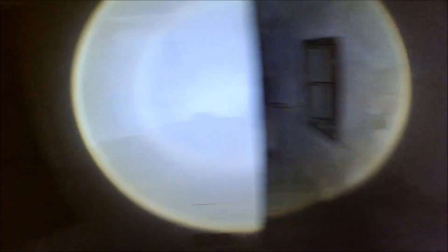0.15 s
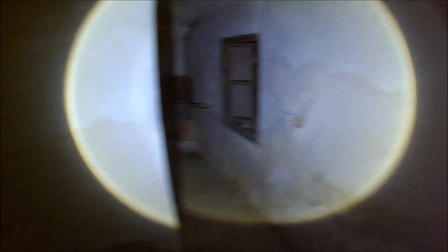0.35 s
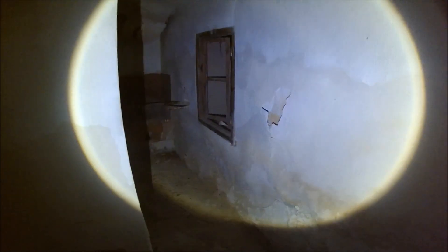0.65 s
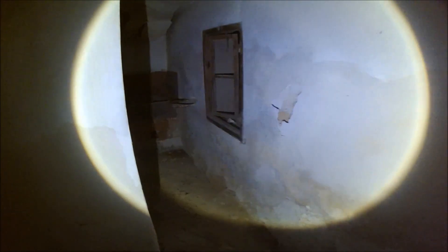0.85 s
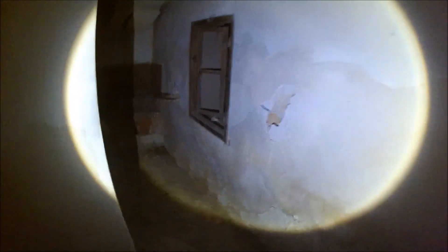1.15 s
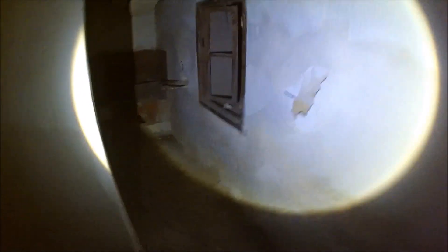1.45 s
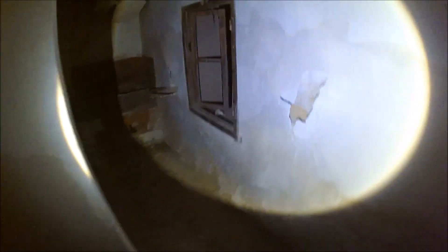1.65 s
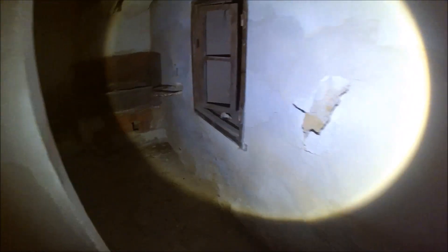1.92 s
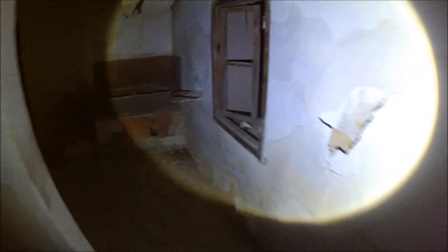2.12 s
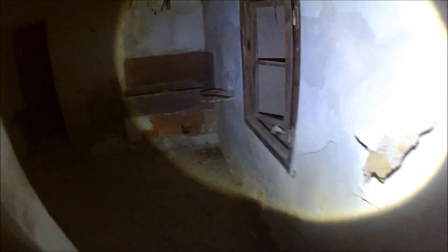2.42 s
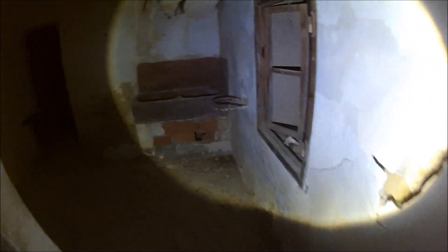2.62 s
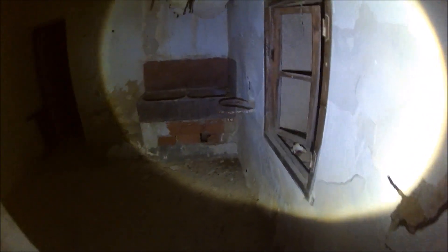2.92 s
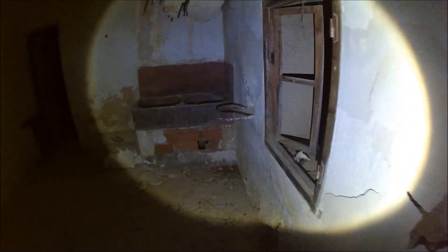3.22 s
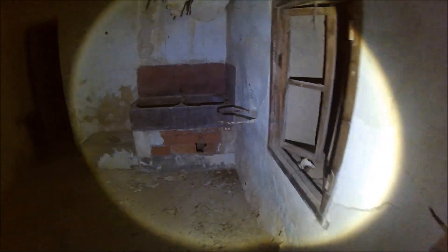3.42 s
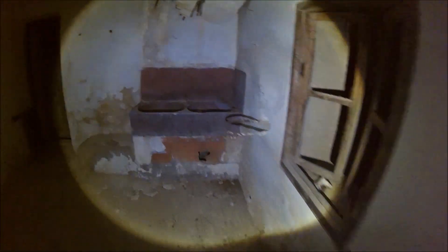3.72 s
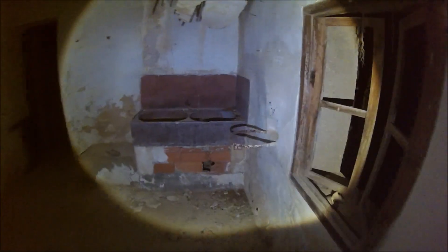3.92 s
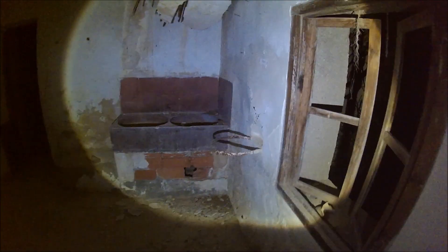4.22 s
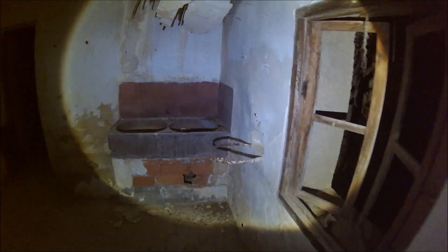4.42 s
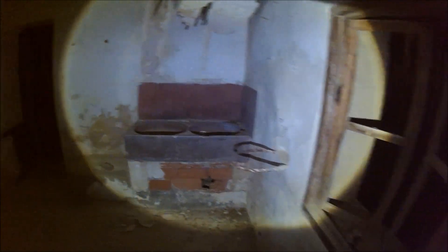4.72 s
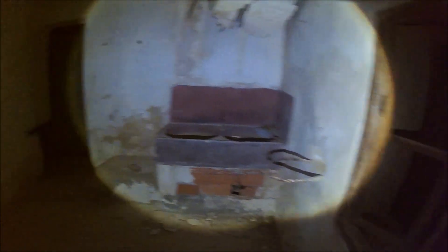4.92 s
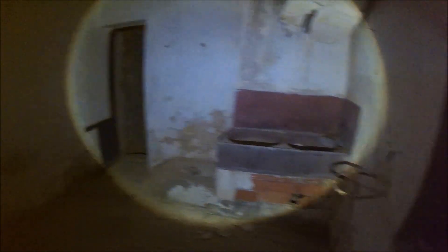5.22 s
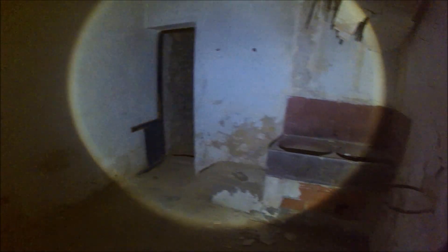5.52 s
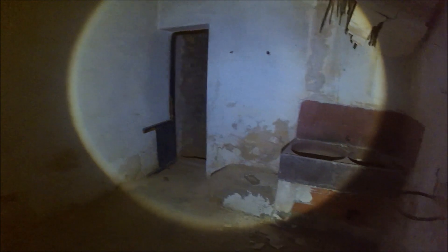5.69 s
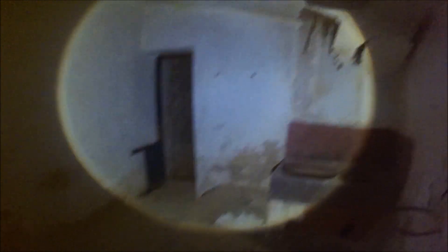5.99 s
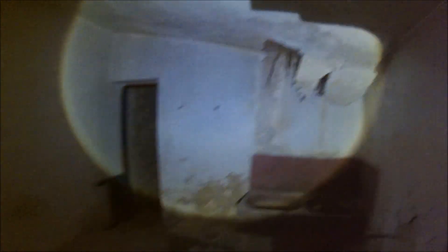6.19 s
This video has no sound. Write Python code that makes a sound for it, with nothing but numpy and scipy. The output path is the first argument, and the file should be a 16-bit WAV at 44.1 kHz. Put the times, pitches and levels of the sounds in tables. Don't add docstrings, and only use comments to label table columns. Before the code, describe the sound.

A person walks cautiously across a rubble-strewn floor in a derelict room. Grit crunches softly, plaster shards snap and scatter, and one hard dry click jumps out before a heavier step about a second in. More cracks follow irregularly, strongest just before four seconds, then it thins to faint grit. A small enclosed microphone makes everything midrange, boxy and muffled, over faint hiss.

```python
import sys
import numpy as np
from scipy import signal
from scipy.fft import rfft, irfft
from scipy.io import wavfile
from scipy.ndimage import uniform_filter1d

SR = 44100
rng = np.random.default_rng(int(sys.argv[2]) if len(sys.argv) > 2 else 0)


def wav_out(sig):
    wavfile.write(sys.argv[1], SR, np.round(np.clip(np.atleast_2d(sig).T, -1, 1) * 32767).astype(np.int16))


def attenuation_scalar(level_db):
    decades = np.asarray(level_db, float) / 20
    return 10 ** decades


N = 280035

# (frequency [Hz], level [dB per Hz])
AIR_COLOUR = [(18, -63), (30, -25), (124, -26), (671, -16), (1090, -9.5), (1320, -2.5), (1610, -9),
              (1960, 1), (2440, -8.5), (3030, -5), (4700, -24.5), (5600, -45), (7280, -74.5), (12300, -120)]
# (frequency [Hz], level [dB per Hz])
FIZZ_COLOUR = [(3290, -32), (5600, -6.5), (6050, -16.5), (6980, -12.5), (8050, -17), (10900, -0.5),
               (13500, -1), (15700, -1)]
# (frequency [Hz], level [dB rms])
WHINE = [(15655, -108), (15714, -99)]
# (time [s], length [s])
DROPOUTS = [(0.01, 0.031), (0.289, 0.014), (0.398, 0.013), (0.612, 0.014), (1.621, 0.0077), (1.7, 0.03),
            (1.783, 0.014), (2.57, 0.018), (2.796, 0.028), (2.849, 0.013), (2.982, 0.0071), (3.024, 0.011),
            (3.361, 0.01), (3.446, 0.011), (3.684, 0.012), (4.176, 0.012), (4.307, 0.0085), (4.964, 0.011),
            (5.092, 0.012), (5.39, 0.01), (5.432, 0.013), (5.712, 0.0081), (5.862, 0.0087), (5.898, 0.012),
            (5.947, 0.0098), (6.118, 0.011), (6.22, 0.015)]
# (frequency [Hz], level [dB per Hz])
HOUSING_COLOUR = [(180, -58.5), (300, -36), (393, -37.5), (456, -20.5), (522, -19), (1030, -11.5),
                  (1380, -1.5), (1580, -4.5), (1720, -2), (2380, -6), (2610, -6), (3760, -16.5),
                  (5280, -26.5), (6040, -67), (7600, -53), (9880, -80.5), (16700, -120)]
# (frequency [Hz], level [dB per Hz])
EDGE_COLOUR = [(1650, -34), (2800, -0.5), (3330, 3), (3750, -1.5), (4160, -9), (4500, -14), (5260, -17),
               (5800, -49.5), (7540, -65), (12800, -120)]
# (frequency [Hz], level [dB per Hz])
TREBLE_COLOUR = [(3410, -45), (5800, -18.5), (6000, -28.5), (7000, -10), (7940, -26.5), (8110, -24),
                 (8420, -15), (9080, -9.5), (10400, -4), (10800, -1.5), (12800, -10), (14800, -4.5),
                 (15800, -14.5)]
# (time [s], peak level [dB], pitch [Hz], time to fall 60 dB [s])
THUDS = [(0.66, -48.5, 892, 0.044), (0.77, -51.5, 897, 0.031), (0.924, -68, 338, 0.074),
         (1.106, -41, 954, 0.024), (1.14, -43, 970, 0.019), (1.855, -65.5, 638, 0.12),
         (3.582, -51.5, 710, 0.027), (4.37, -74, 796, 0.13), (6.034, -68, 864, 0.05),
         (6.072, -59, 910, 0.042), (6.151, -60, 890, 0.036), (6.204, -65, 920, 0.07)]
# (time [s], peak level [dB], pitch [Hz], time to fall 60 dB [s])
KNOCKS = [
    (0.772, -59, 560, 0.035),
    (1.108, -73.5, 98, 0.21),
    (1.108, -68, 192, 0.16),
    (1.111, -77, 332, .08),
    (1.17, -65, 235, 0.048),
    (4.372, -81.5, 225, 0.08),
]
# (time [s], level [dB], time to fall 60 dB [s])
GRIP_HUMS = [
    (0.661, -84, 0.53),
    (1.38, -88.5, 0.97),
    (6.049, -86.5, 0.64),
]
# (time [s], crunch level [dB])
WEIGHT = [(0.0, -60.5), (0.3, -65), (0.76, -64.5), (1.03, -56), (1.34, -51.5), (1.56, -63.5), (1.82, -64),
          (2.0, -52), (2.25, -61), (2.44, -65.5), (3.11, -65), (3.4, -59), (3.84, -55.5), (4.14, -66),
          (4.88, -63), (5.68, -70), (6.08, -58.5), (6.35, -76.5)]
# (time [s], low body level [dB], gritty edge level [dB])
STOMPS = [
    (0.84, -85, -85),
    (1.105, -62.5, -58),
    (1.96, -76, -63),
    (3.58, -75, -85),
    (4.37, -81, -78),
]
# (time [s], length [s], crunch level [dB], edge level [dB], treble level [dB])
TWISTS = [(0.662, 0.14, -58, -64, -101), (1.033, 0.051, -77, -63, -102), (1.332, 0.042, -44.5, -50, -76.5),
          (1.382, 0.025, -57, -59, -97), (1.439, 0.051, -56, -65, -105), (1.941, 0.072, -54, -71, -88),
          (3.394, 0.047, -52.5, -61, -88), (3.582, 0.057, -64, -69.5, -78.5),
          (3.722, 0.053, -56, -61.5, -86), (4.687, 0.022, -57, -79, -100), (4.378, 0.14, -67, -81, -111),
          (5.075, 0.034, -59.5, -65.5, -103), (4.847, 0.044, -70, -82, -110)]
# (time [s], peak level [dB], ring pitch [Hz], scatter below peak [dB], crack below peak [dB])
SHARDS = [(0.426, -28.5, 1790, -20.5, -14.5), (0.662, -31.5, 1336, -23, -24), (1.022, -43, 2100, -8, -14),
          (1.047, -46, 2400, -6.5, -23), (1.109, -30.5, 1280, -9.5, -24), (1.15, -34, 1380, -17.5, -13),
          (1.475, -46, 1270, -1.5, -23), (1.856, -39.5, 1600, -6, -5.5), (1.948, -34.5, 1920, -10.5, -11),
          (2.064, -29.5, 1450, -16.5, -11.5), (2.147, -26, 1420, -19, -33),
          (2.173, -37.5, 1950, -10.5, -13), (2.625, -23, 1410, -16, -32), (2.643, -19.5, 1267, -18, -28),
          (2.85, -47, 1380, -8.5, -20), (3.401, -35, 1515, -16.5, -6), (3.584, -28.5, 1450, -16, -11),
          (3.618, -37.5, 1620, -15, -3), (3.722, -23.5, 1440, -14, -20), (3.904, -14, 1350, -20, -37),
          (3.925, -24.5, 1353, -18, -43), (4.7, -41.5, 1260, -3, -34), (4.836, -52.5, 1220, 1, -33),
          (6.029, -51, 1390, -7, -26)]
# (time [s], peak level [dB], ring pitch [Hz], scatter below peak [dB])
CHIPS = [(0.436, -33.5, 2110, -16), (0.655, -38.5, 1970, -13.5), (0.948, -44, 1670, -15),
         (1.129, -40, 1540, -8), (1.395, -34.5, 1850, -20.5), (1.737, -49.5, 1540, -6),
         (1.923, -46, 1840, -30), (2.005, -51, 1980, -30), (2.544, -55, 1800, -20), (2.963, -52, 1400, -11),
         (3.021, -48.5, 2220, -10.5), (3.028, -49.5, 1570, -14.5), (3.084, -48, 1750, -23),
         (3.154, -43.5, 1740, -20), (3.167, -40.5, 1730, -19), (3.223, -42.5, 1800, -21),
         (3.282, -43, 2200, -27), (3.306, -43.5, 1770, -26), (3.375, -44, 1570, -17),
         (3.394, -43, 1740, -15), (3.405, -34.5, 1450, -28), (3.551, -42.5, 1450, -12.5),
         (4.149, -48.5, 2560, -12.5), (4.478, -54, 1800, -9), (4.684, -43, 1300, -9),
         (4.711, -45, 1350, -20), (5.078, -54, 2030, -12), (5.759, -46.5, 1731, -12),
         (6.082, -51, 1710, -22), (6.153, -46.5, 1300, -16)]
# (time [s], peak level [dB], ring pitch [Hz], crack below peak [dB])
HOUSING_CLICKS = [
    (0.756, -33, 1950, -15),
    (0.772, -10.5, 1742, -5.5),
    (0.925, -35, 1980, -23),
    (3.669, -20.5, 1840, -48),
]
# (time [s], peak level [dB], ring pitch [Hz])
FURTHER_CHIPS = [(2.289, -62, 1850), (3.067, -52, 1540), (3.181, -50, 1350), (3.226, -47, 2820), (3.325, -57, 1710),
                 (3.403, -36.5, 2830), (3.099, -51, 4650), (0.938, -55, 4500), (1.334, -30, 1920),
                 (4.129, -49.5, 1260), (5.103, -50, 2180), (5.95, -47, 1700), (6.112, -50, 1790), (6.205, -55, 1290)]
# (time [s], peak level [dB])
SPLINTERS = [(0.772, -38.5), (1.9224, -69), (1.947, -66), (1.9977, -70), (2.0632, -52.5), (3.0841, -62),
             (3.3044, -59), (3.583, -58), (3.617, -53.5), (3.723, -52), (4.686, -69), (2.625, -68),
             (2.642, -64)]

AIR_DB, FIZZ_DB = -67.5, -85
GRIP_HZ = 181.3
REST_DB = -63
EDGE_DB, EDGE_FOLLOWS = -81, 1.0
DUST_DB, DUST_FOLLOWS = -92.5, 0.25
BODY_DB, BODY_FOLLOWS = -93.5, 0.6
STOMP_RISE_S, STOMP_T60_S = 0.018, 0.3
TWIST_FADE_S, TWIST_RELEASE_S = 0.006, 0.011
TWIST_BAND_HZ = (1230, 2860)
SHARD_T60_S = 0.25
CHIP_T60_S, CHIP_SCATTER_DB, CHIP_CRACK_DB = 0.14, -16.5, -18
CLICK_T60_S, CLICK_SCATTER_DB = 0.017, -22.5
FIRST_SLIP = 6.1
FRACTURE_SAMPLES = 800
NOTCH_HZ, NOTCH_WIDTH_HZ = 3150, 450
PORT_HZ, PORT_WIDTH_HZ, PORT_SHARE = 10450, 700, 0.8
KEPT_HZ, SPARED_DB = (730, 4000), -80
DROPOUT_FADE_S = 0.012
ROUNDING_DB, CUTOFF_HZ = -101, 16200


def rms_one(x):
    return x / np.sqrt(np.mean(x ** 2) + 1e-20)


def colour(x, points):
    hz, db = np.transpose(points)
    grid = np.maximum(np.arange(2049) * SR / 4096, 10)
    log_gain = np.interp(np.log(grid), np.log(hz), db) * np.log(10) / 20
    cepstrum = irfft(log_gain)
    cepstrum[1:2048] *= 2
    cepstrum[2049:] = 0
    pulse = irfft(np.exp(rfft(cepstrum)))
    pulse = pulse / np.sqrt(np.sum(pulse ** 2))
    return signal.fftconvolve(x, pulse)[:len(x)]


def band(x, low_hz, high_hz):
    return signal.sosfilt(signal.butter(2, [low_hz, high_hz], "band", fs=SR, output="sos"), x)


def drift(rate_hz):
    r = np.exp(-2 * np.pi * rate_hz / SR)
    settled = signal.lfilter([1], [1, -2 * r, r * r], rng.standard_normal(N + SR))[SR:]
    return rms_one(settled)


def grains(per_s, spread_db):
    force = attenuation_scalar(spread_db * np.minimum(rng.exponential(1, N), 4))
    clicks = force * rng.choice([-1, 1], N)
    return rms_one(clicks * (rng.random(N) < per_s / SR))


def ringing(hz, t60, seconds, rise):
    t = np.arange(int(seconds * SR)) / SR
    wave = np.sin(2 * np.pi * hz * t) * attenuation_scalar(-60 * t / t60) * (1 - np.exp(-t / rise))
    return wave / np.max(np.abs(wave))


def burst(click, low_hz, high_hz, narrow):
    centre, half = (low_hz + high_hz) / 2, narrow * (high_hz - low_hz) / 2
    wave = band(band(click, low_hz, high_hz), centre - half, centre + half)
    return wave / np.max(np.abs(wave))


def add(track, s, wave):
    at = int(s * SR)
    track[at:at + len(wave)] += wave[:N - at]


def boxes(rows, fade_s):
    out = np.zeros(N)
    for s, length, gain in rows:
        add(out, s, np.full(int(length * SR), gain))
    width = int(fade_s * SR)
    flank = rms_one(np.hanning(width) + 1e-9) / (0.816 * width)
    return np.convolve(out, flank, "same")


def background_hiss():
    air = attenuation_scalar(AIR_DB + 2.4 * drift(9.0)) * colour(rng.standard_normal(N), AIR_COLOUR)
    fizz = attenuation_scalar(FIZZ_DB) * colour(rng.standard_normal(N), FIZZ_COLOUR)
    return air + fizz


def thuds():
    out = np.zeros(N)
    for s, db, hz, t60 in THUDS + KNOCKS:
        add(out, s, attenuation_scalar(db) * ringing(hz, max(t60, 0.01), 0.3, rise=0.00065))
    for s, db, t60 in GRIP_HUMS:
        add(out, s, attenuation_scalar(db) * ringing(GRIP_HZ, t60, 0.6, rise=0.024))
    return out


def stomp_gains():
    t = np.arange(SR // 2) / SR
    shape = (1 - np.exp(-t / STOMP_RISE_S)) * attenuation_scalar(-60 * t / STOMP_T60_S)
    low, edge = np.zeros(N), np.zeros(N)
    for s, low_db, edge_db in STOMPS:
        add(low, s, attenuation_scalar(low_db + 3) * shape)
        add(edge, s, attenuation_scalar(edge_db + 5.5) * shape)
    return low, edge


def twist_gain(column):
    rows = [(row[0], row[1], attenuation_scalar(row[column])) for row in TWISTS]
    held = boxes(rows, TWIST_FADE_S)
    keep = np.exp(-1 / (TWIST_RELEASE_S * SR))
    release = signal.lfilter([1 - keep], [1, -keep], held + 1e-18)
    return np.maximum(held, release)


def crunch():
    weight_db = np.interp(np.arange(N) / SR, *np.transpose(WEIGHT))
    swing_db = weight_db - REST_DB
    stomp_low, stomp_edge = stomp_gains()
    twist_crunch, twist_edge, twist_treble = [twist_gain(column) for column in (2, 3, 4)]

    grit = grains(3500, 2.4) * attenuation_scalar(1.7 * drift(46))
    dust = grains(15000, 0.6)
    housed = colour(grit, HOUSING_COLOUR)

    edge_gain = attenuation_scalar(EDGE_DB + EDGE_FOLLOWS * swing_db) + stomp_edge + twist_edge
    dust_gain = attenuation_scalar(DUST_DB + DUST_FOLLOWS * swing_db) + twist_treble
    body_gain = attenuation_scalar(BODY_DB + BODY_FOLLOWS * swing_db) + stomp_low

    pressing = attenuation_scalar(weight_db - 3.5) * rms_one(band(housed, 660, 2900))
    twisting = twist_crunch * rms_one(band(housed, *TWIST_BAND_HZ))
    edge = edge_gain * rms_one(colour(grit, EDGE_COLOUR))
    treble = dust_gain * rms_one(colour(dust + 0.5 * grit, TREBLE_COLOUR))
    body = body_gain * rms_one(band(grit, 180, 810))
    return pressing + twisting + edge + treble + body


def fractures(count):
    t = np.arange(FRACTURE_SAMPLES) / SR
    out = rng.standard_normal((count, FRACTURE_SAMPLES)) * np.exp(-t / 0.0011)
    out[:, 0] += FIRST_SLIP
    return out


def splinters():
    ticks = np.zeros(N)
    for (s, db), fracture in zip(SPLINTERS, fractures(len(SPLINTERS))):
        add(ticks, s - 0.0005, attenuation_scalar(db - 6.0) * fracture)
    bright = band(colour(ticks, TREBLE_COLOUR), 6000, 15000)
    port = signal.lfilter(*signal.iirpeak(PORT_HZ, PORT_HZ / PORT_WIDTH_HZ, fs=SR), bright)
    return (1 - PORT_SHARE) * bright + 2 * PORT_SHARE * port


def all_breaks():
    breaks = []
    for s, db, hz, scatter_db, crack_db in SHARDS:
        breaks.append((s, db, hz, SHARD_T60_S, scatter_db, crack_db))
    for s, db, hz, scatter_db in CHIPS:
        breaks.append((s, db, hz, CHIP_T60_S, scatter_db, CHIP_CRACK_DB))
    for s, db, hz, crack_db in HOUSING_CLICKS:
        breaks.append((s, db, hz, CLICK_T60_S, CLICK_SCATTER_DB, crack_db))
    for s, db, hz in FURTHER_CHIPS:
        breaks.append((s, db, hz, CHIP_T60_S, CHIP_SCATTER_DB, CHIP_CRACK_DB))
    return breaks


def snaps():
    out = np.zeros(N)
    grit = rms_one(colour(grains(7000, 5.13), HOUSING_COLOUR))
    t = np.arange(SR // 2) / SR
    click = np.zeros(FRACTURE_SAMPLES)
    click[0] = 1
    breaks = all_breaks()
    notch = signal.iirnotch(NOTCH_HZ, NOTCH_HZ / NOTCH_WIDTH_HZ, fs=SR)
    cracks = signal.lfilter(*notch, fractures(len(breaks)))

    for (s, db, hz, t60, scatter_db, crack_db), fracture in zip(breaks, cracks):
        ring = burst(click, hz * 0.65, hz * 1.466, narrow=0.28)
        crack = burst(fracture, 2100, 5870, narrow=1.0)
        add(out, s - 0.0008, attenuation_scalar(db - 3.5) * ring)
        add(out, s - 0.0008, attenuation_scalar(db + crack_db + 2.0) * crack)

        piece = grit[int(s * SR):][:len(t)]
        piece = attenuation_scalar(crack_db * 0.29) * piece + 1.2 * band(piece, hz * 0.67, hz * 1.386)
        early = 0.81 * attenuation_scalar(-60 * t / 0.026) * (t60 > 0.06)
        late = 0.5 * attenuation_scalar(-45 * t / max(t60, 0.01))
        envelope = (early + late) * (1 - np.exp(-t / 0.00047))
        add(out, s, attenuation_scalar(db + scatter_db) * piece * envelope[:len(piece)])

    return signal.sosfilt(signal.cheby2(6, 40, 5900, fs=SR, output="sos"), out)


def scene():
    return (background_hiss() + thuds() + crunch() + splinters() + snaps())[None]


def band_limit(x):
    return signal.sosfilt(signal.butter(12, 16300, fs=SR, output="sos"), x)


def record(dry):
    kept = signal.sosfiltfilt(signal.butter(4, KEPT_HZ, "band", fs=SR, output="sos"), dry)
    upper = signal.sosfiltfilt(signal.butter(4, [KEPT_HZ[1], 5500], "band", fs=SR, output="sos"), dry)
    loud_grit = uniform_filter1d(upper ** 2, size=1024) > attenuation_scalar(2 * SPARED_DB)
    kept = kept + upper * loud_grit

    rows = [(s - 0.002, length + 0.0026, 1.0) for s, length in DROPOUTS]
    dropout = np.clip(boxes(rows, DROPOUT_FADE_S), 0, 1)
    thinned = dry + dropout * (kept - dry)
    thinned = signal.sosfilt(signal.ellip(10, 0.5, 50, 15740, fs=SR, output="sos"), thinned)

    t = np.arange(N) / SR
    whine = sum(attenuation_scalar(db + 13) * np.sin(2 * np.pi * hz * t) for hz, db in WHINE)
    rounding = attenuation_scalar(ROUNDING_DB) * rng.standard_normal(N)
    top_cut = signal.cheby2(12, 50, CUTOFF_HZ, fs=SR, output="sos")
    finished = signal.sosfilt(top_cut, thinned + whine + rounding)
    return band_limit(finished)


dry = scene()
out = record(dry)
wav_out(out)
```